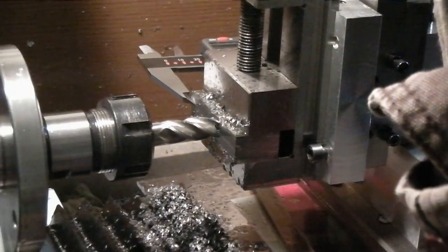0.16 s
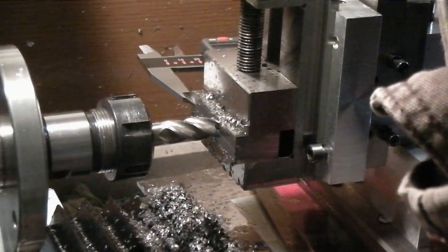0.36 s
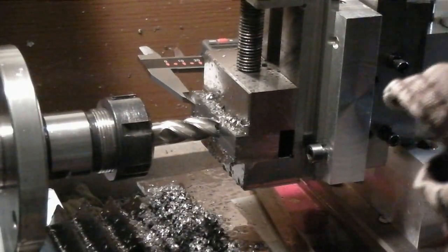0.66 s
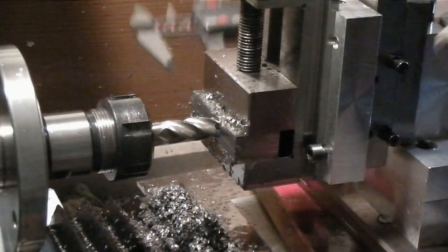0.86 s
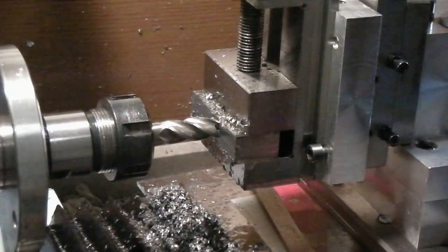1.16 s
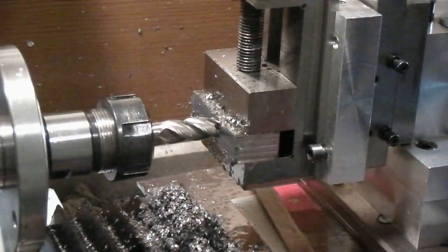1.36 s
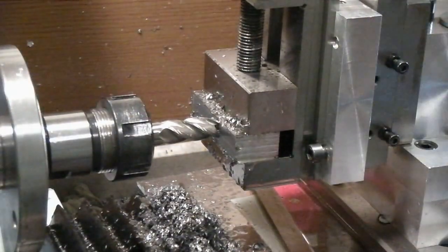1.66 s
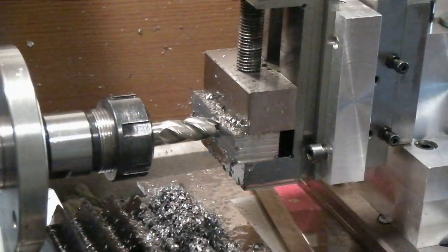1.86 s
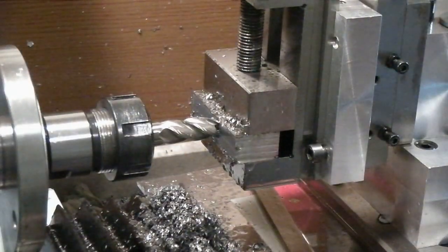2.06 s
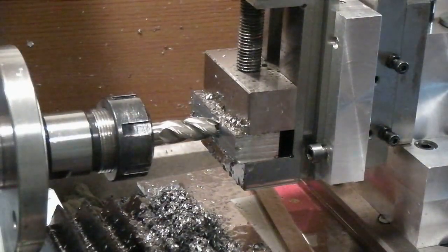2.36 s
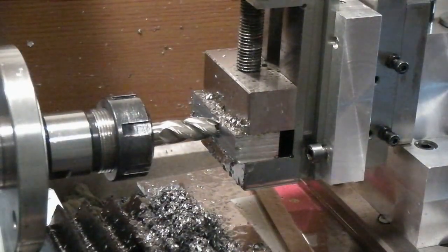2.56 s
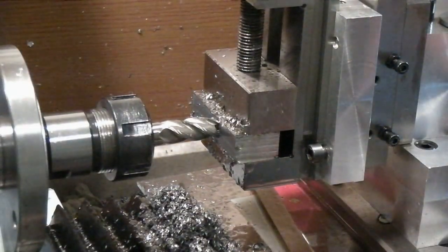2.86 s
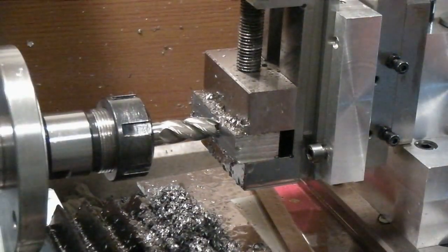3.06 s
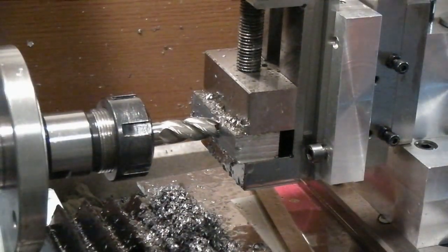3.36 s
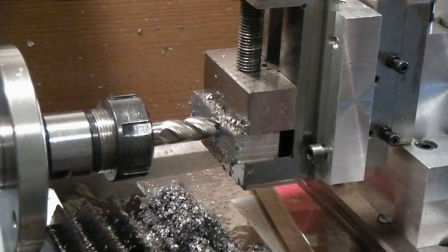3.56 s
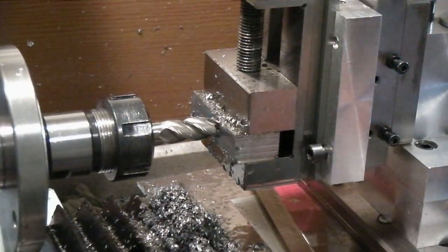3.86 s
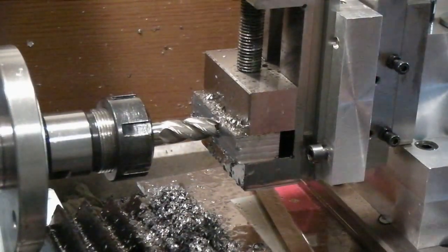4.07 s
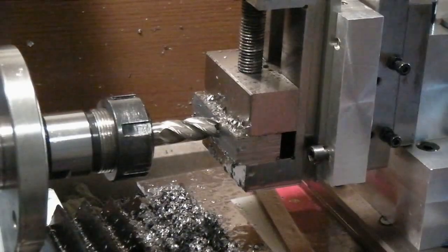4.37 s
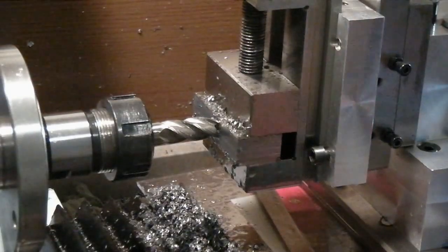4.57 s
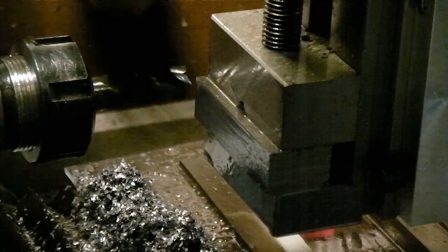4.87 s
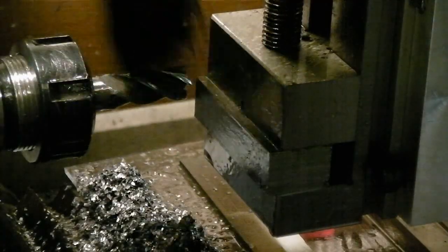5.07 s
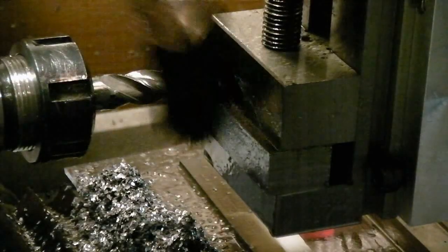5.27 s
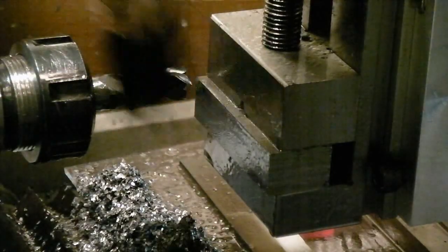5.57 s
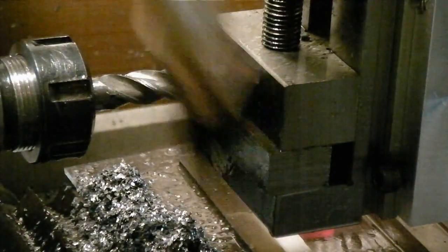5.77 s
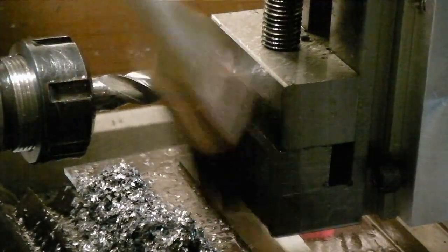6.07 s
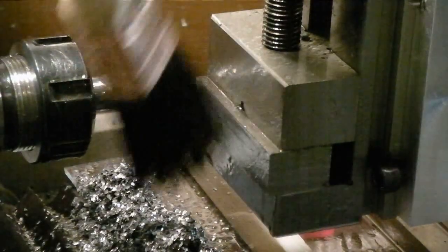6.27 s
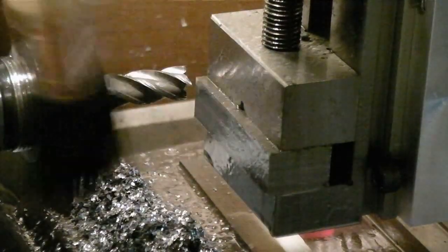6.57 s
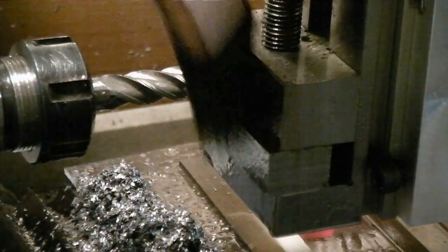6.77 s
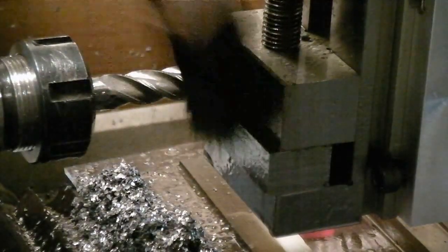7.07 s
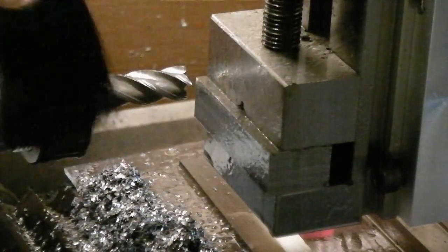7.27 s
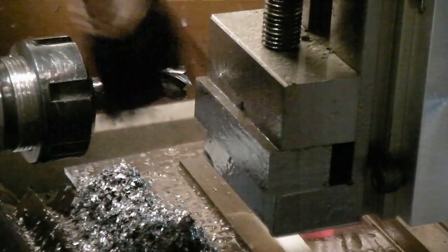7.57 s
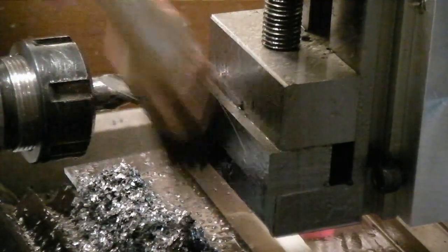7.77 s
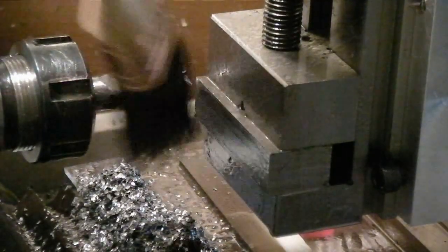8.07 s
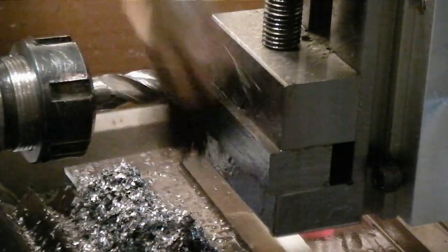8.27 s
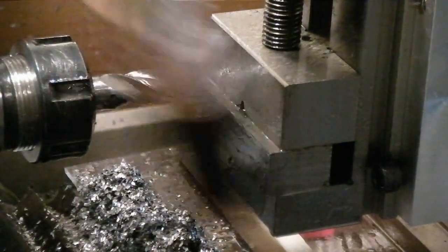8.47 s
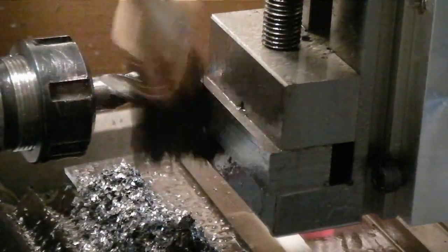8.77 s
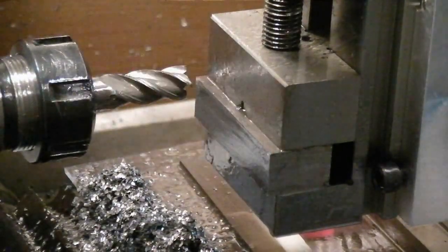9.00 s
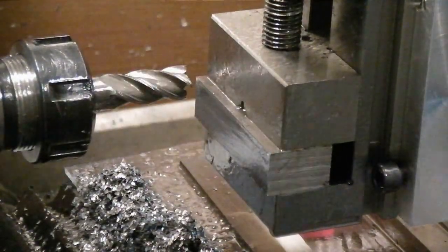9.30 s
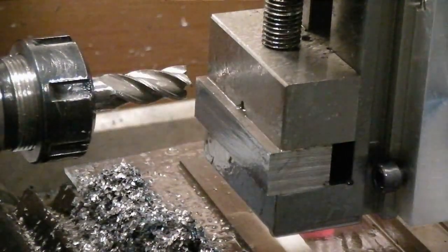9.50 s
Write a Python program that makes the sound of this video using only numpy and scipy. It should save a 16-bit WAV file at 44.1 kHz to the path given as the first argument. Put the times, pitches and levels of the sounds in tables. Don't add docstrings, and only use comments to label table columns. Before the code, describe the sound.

A close stereo pickup in a small workshop, with soft hiss, a thin regular electrical buzz and faint low rumble. Near 0.9-1.2 s a thin steel tool makes light, bright ticks; at 1.4-1.6 s a handle is set down with dull knocks and sleeve rustle. A crisp metallic snap comes at 1.8 s, then thin scraping, with a faint rising squeal near 2.8 s. Hard ringing drops hit at 3.0 and 3.1 s, another with a short scrape at 3.3 s, and a heavy clamp slams loudest at 3.75 s, bouncing and booming the bench. Smaller clinks continue to 4.75 s. After about a tenth of a second of silence, the hiss and rumble return stronger and a stiff brush sweeps chips in about twenty quick, grainy, bright strokes from 5 to 8.9 s, with sharp little ticks. Soft rustle and room noise finish by 9.7 s.

```python
import sys
import numpy as np
from scipy import signal
from scipy.fft import rfft, irfft, next_fast_len
from scipy.io import wavfile
from scipy.ndimage import uniform_filter1d

SR = 44100
rng = np.random.default_rng(int(sys.argv[2]) if len(sys.argv) > 2 else 0)


def to_wav(sig):
    pcm = np.clip(np.atleast_2d(sig), -1, 1) * 32767
    pcm = np.round(pcm).astype(np.int16)
    wavfile.write(sys.argv[1], SR, pcm.T)


def volts_from_decibels(level):
    exponent = np.asarray(level, float) / 20
    return 10 ** exponent


N = 425124

# (f/Hz, level/dB)
PORT_SIDE = [(60, -2.5), (110, -23), (200, -17.5), (380, -24.5), (700, -28), (1290, -26), (2380, -19),
             (4400, -12.5), (8120, -9.5), (15000, -2.5)]


def level(x, db):
    return x * volts_from_decibels(db) / np.sqrt(np.mean(x ** 2))


def colour(x, points):
    n = next_fast_len(x.shape[-1])
    hz, db = np.transpose(points)
    gain_db = np.interp(np.log(np.fft.rfftfreq(n, 1 / SR) + 1), np.log(hz), db)
    return irfft(rfft(x, n) * volts_from_decibels(gain_db), n)[..., :x.shape[-1]]


def band(x, lo_hz, hi_hz):
    return signal.sosfilt(signal.butter(2, [lo_hz, hi_hz], "band", fs=SR, output="sos"), x)


def resonate(x, peaks):
    out = 0
    for hz, width_hz, db in peaks:
        b, a = signal.iirpeak(hz, hz / width_hz, SR)
        out = out + volts_from_decibels(db) * signal.lfilter(b, a, x) / np.sqrt(width_hz)
    return out


def modes(table, t, detune):
    hz, db, t60_s = np.transpose(table)[:, :, None]
    detune = np.asarray(detune, float)[:, None]
    return np.sum(volts_from_decibels(db - 60 * t / t60_s) * np.sin(2 * np.pi * hz * (1 + detune) * (t + detune)), axis=0)


def walk(rate_hz):
    k = int(SR / rate_hz)
    held = np.repeat(rng.standard_normal(N // k + 1), k)
    return 1.47 * uniform_filter1d(held, k)[:N]


def grains(per_s, spread_db):
    hit = rng.random(N) < per_s / SR
    slip, extra = rng.standard_normal(N), rng.exponential(size=N)
    out = np.zeros(N)
    out[hit] = slip[hit] * volts_from_decibels(spread_db * np.minimum(extra[hit], 4))
    return out


def swells(rows):
    t, out = np.arange(N) / SR, np.full(N, -120.)
    for s, rise_s, fall_s, db in rows:
        span = slice(max(int((s - 4 * rise_s) * SR), 0), int((s + 4 * fall_s) * SR))
        drop_db = 20 * np.maximum((s - t[span]) / rise_s, (t[span] - s) / fall_s)
        out[span] = np.maximum(out[span], db - drop_db)
    return out


def ports(mid, side, points):
    side = colour(side, points)
    return np.array([mid + side, mid - side])


def rumble():
    # (t/s, level/dB)
    machinery = [(0.0, -79), (0.82, -68), (1.25, -70), (1.52, -67.5), (2.18, -72), (2.47, -67), (2.87, -73),
                 (3.19, -66), (3.53, -73), (4.7, -68), (4.8, -57.5), (5.5, -60), (6.3, -55.5), (7.0, -56.5),
                 (7.701, -57.5), (8.77, -57), (9.64, -64)]
    # (f/Hz, width/Hz, level/dB)
    room_modes = [(52.5, 19, 1.5), (76, 24, 0), (133, 13, -4.5), (242, 64, 2.5), (422, 136, -6)]
    # (fullest t/s, rise/s, fall/s, level/dB)
    treads = [
        (0.3, 2.5, 2.5, -77.5),
        (1.52, 1.4, 1.3, -67),
        (3.76, 0.092, 0.45, -45),
        (4.3, 0.95, 1.8, -61),
        (4.74, 0.28, 0.16, -52),
        (5.55, 0.82, 4.5, -55),
        (7.65, 3.5, 2.3, -57.5),
        (8.5, 1.1, 2.4, -56),
    ]
    deep_db = np.interp(np.arange(N) / SR, *np.transpose(machinery))
    upper_db = np.maximum(deep_db - 3.5, swells(treads))
    out = 0
    for hz, width_hz, db in room_modes:
        pair = level(resonate(rng.standard_normal((2, N)), [(hz, width_hz, 0)]), db)
        drive_db = upper_db if hz > 110 else deep_db
        out = out + pair * volts_from_decibels(2.0 * walk(2.01) + drive_db - 2.0)
    return np.array([out[0] + 0.057 * out[1], out[0] - 0.11 * out[1]])


def rustle():
    # (fullest t/s, rise/s, fall/s, rub level/dB, crispness/dB)
    moves = [(0.94, 0.29, 0.61, -69, -2), (1.44, 0.19, 0.68, -58, -2), (1.47, .05, .12, -51.5, -11),
             (1.53, .06, 0.086, -52.5, -6), (1.63, .04, 0.12, -59, -10), (1.95, 0.85, 0.13, -67.5, 6),
             (2.65, 1.2, 0.88, -61, 1), (3.0, 1.2, 0.0081, -60, 1.5), (3.38, 0.37, 0.58, -49.5, -17),
             (3.62, 0.83, 0.087, -60.5, 2), (3.695, 0.094, 0.19, -46.5, -17), (3.96, 0.073, 0.59, -54.5, 2),
             (4.26, 0.93, 0.72, -58.5, 1), (4.72, 0.51, 0.35, -72, 2.5), (9.238, 0.17, 0.45, -56.5, -1),
             (9.6, 1.6, 1.5, -59, 0)]
    rub = level(band(grains(5000, 1.5), 300, 1900) * volts_from_decibels(1.5 * walk(25)), 0)
    fine = level(band(grains(8000, 1.5), 1800, 7500) * volts_from_decibels(1.2 * walk(30)), 0)
    rub_rows = [row[:4] for row in moves]
    fine_rows = [(s, rise_s, fall_s, db + crisp_db) for s, rise_s, fall_s, db, crisp_db in moves]
    return rub * volts_from_decibels(swells(rub_rows)) + fine * volts_from_decibels(swells(fine_rows))


def contact_shape(hz, hard_db, thud_db, clink_db, crack_db):
    wide_db = 10 * np.log10(hz / 1500)
    thud_db = thud_db + wide_db
    clink_db = clink_db + hard_db
    crack_db = crack_db + 1.7 * hard_db + wide_db
    return [(110, thud_db - 16.5),
            (min(420, hz / 1.7), thud_db + 8.5),
            (hz / 1.5, -7), (hz, 0), (hz * 1.21, -6),
            (max(min(hz * 1.68, 4700), hz * 1.35), .5 * clink_db - 10.0),
            (max(5000, hz * 1.4), clink_db + wide_db - 2.0),
            (max(6500, hz * 0.72), clink_db + wide_db - 7.5),
            (10000, crack_db - 4.5), (15000, crack_db - 12.5)]


def knocks():
    # (t/s, peak level/dB, body f/Hz, hardness/dB)
    gauge = [
        (0.843, -46.5, 1730, -7),
        (0.939, -40, 2300, -9),
        (.945, -48, 2200, -3),
        (0.9735, -32, 2900, 5),
        (1.121, -41, 2970, -9),
        (1.138, -50, 2900, -4),
        (1.148, -48, 4500, 4),
        (1.161, -49, 2900, 2),
        (1.174, -40.5, 2760, -1.5),
    ]
    spanner = [
        (2.428, -37.5, 2880, -12),
        (2.448, -39, 2950, -5),
        (3.0225, -12.5, 2730, 1.5),
    ]
    handle = [
        (1.429, -40, 566, 4.5),
        (1.456, -37, 610, -4),
        (1.509, -41.5, 696, 5),
        (1.618, -40.5, 700, -8),
        (3.45, -38, 644, 3),
        (3.467, -32.5, 606, 1),
        (3.479, -30.5, 640, 1.5),
    ]
    clamp = [
        (3.745, -18.5, 1050, -5),
        (3.753, -5, 2000, 0.5),
        (3.761, -18, 2050, -5),
        (3.777, -20, 2030, 2.5),
        (3.815, -18, 1660, -2),
        (3.85, -32, 2000, -4),
        (3.919, -37, 5200, 4),
        (3.978, -36, 4030, 3),
    ]
    key = [
        (4.167, -31, 1750, 0.5),
        (4.174, -36.5, 1660, -9),
        (4.43, -33, 1590, 0),
        (4.489, -37, 2200, -2),
        (4.497, -35.5, 2050, -8),
        (4.531, -34, 4250, -6),
        (4.651, -27.5, 1530, 1.5),
        (4.746, -32.5, 1320, -1),
        (4.752, -33, 2990, -2.5),
    ]
    jaws = [
        (1.833, -31, 5020, 4.7),
        (1.8355, -25, 5640, 4.1),
        (2.038, -45.5, 3580, 3.8),
    ]
    pin = [
        (2.103, -40, 3300, -2),
        (3.297, -22.5, 2050, .5),
    ]
    mallet = [
        (3.1205, -13.5, 1250, 0.5),
        (3.124, -14.5, 718, -8.5),
        (3.143, -25.5, 1406, -5),
    ]
    # (f/Hz, level/dB, t60/s)
    gauge_ring = [(2730, -4, 0.069), (3085, -6, .12), (3530, 7, .05), (4530, 3, 0.21), (4400, 8.5, 0.079),
                  (5480, 3, 0.063), (5900, 2, 0.074), (8830, 1, .04), (9500, -13, 0.045)]
    spanner_ring = [(2760, 0, 0.063), (3170, -8.5, 0.089), (5060, 4, 0.041), (5380, -3.5, 0.1),
                    (5670, 1.5, 0.054), (6340, -9, 0.13), (9000, -20, 0.13), (10840, -6.5, 0.15)]
    handle_ring = [(671, -5.5, 0.25), (786, -6.5, 0.19), (1250, 1, 0.072), (1650, -3.5, 0.067)]
    clamp_ring = [(1180, -9, 0.34), (1580, -4.5, 0.25), (1750, -8.5, 0.2), (1910, -14, 0.22),
                  (2000, -3, 0.19), (2142, 2, 0.1), (2260, -12, 0.22), (2404, -21, 0.23), (3300, -26, .25),
                  (4930, -21, .3), (5560, -15, .3), (7200, -19.5, .2)]
    key_ring = [(1587, -1, 0.34), (1747, -6, 0.41), (2050, 0.5, 0.096)]
    jaws_ring = [(2720, -3, 0.039), (4470, -9, .15), (5080, 0, 0.16), (7100, -9, 0.092), (5600, -1, 0.15),
                 (6100, -1, .16), (6620, -1, .12), (8270, -14, .08), (8850, -9, .12), (10700, -12, .1),
                 (11320, -18, .1), (12050, -18, .1)]
    pin_ring = [(1330, -4, .1), (2070, -4, 0.13), (2950, 8, 0.044), (4530, -1.5, 0.051), (6000, 3, 0.07),
                (9500, -10, .06), (12320, -24, 0.059)]
    mallet_ring = [(781, -5.5, 0.39), (1040, -9, 0.27), (1280, -9.5, 0.15), (1510, -3, 0.2),
                   (1770, -2.5, .15), (3590, -17.5, .1)]
    # (blows, modes, contact/s, thud/dB, clink/dB, crack/dB)
    objects = [(gauge, gauge_ring, 0.0032, -41, -5, -10),
               (spanner, spanner_ring, 0.001, -12, -5, -13),
               (handle, handle_ring, 0.003, -5, -10, -27),
               (clamp, clamp_ring, 0.0031, -14, -16, -22.5),
               (key, key_ring, 0.0058, -8, -4, -15.5),
               (jaws, jaws_ring, 0.0012, -28, -8, -12),
               (pin, pin_ring, 0.00096, -11.5, -3.5, -12.5),
               (mallet, mallet_ring, 0.0011, -16.5, -12.5, -21)]
    rings_db = [-9, -8, -15, -11.5, -14.5, -9.5, -12, -15.5]
    ring_per_hardness = [1.24, 0.64, 0.29, 0.35, 0.033, 0.85, .3, 0.059]
    # (note level/dB, note t60/s, scratch level/dB)
    bodies = [(-4, 0.049, 11), (-4.5, 0.025, 0.5), (-5.5, .04, -1.5), (-2, .025, -5), (-12.5, 0.031, 4),
              (-3.5, 0.021, -.5), (-8, .03, 0.5), (-4, .03, -5.5)]
    near, far = np.zeros(N + SR), np.zeros(N + SR)
    t = np.arange(6144) / SR
    snap_s = 0.00036
    for thing, ring_db, more, body in zip(objects, rings_db, ring_per_hardness, bodies):
        blows, ring, contact_s, *shape_db = thing
        note_db, note_s, scratch_db = body
        decay = np.exp(-t / contact_s) + 0.082 * np.exp(-t / 0.013)
        envelope = (1 - np.exp(-t / (0.22 * contact_s))) * decay
        for s, db, hz, hard_db in blows:
            shape = contact_shape(hz, hard_db, *shape_db)
            wide_db = 10 * np.log10(hz / 1500)
            size = volts_from_decibels(db - wide_db)
            burst = volts_from_decibels(scratch_db) * colour(rng.standard_normal(len(t)), shape) * envelope
            note = volts_from_decibels(wide_db) * modes([(hz, note_db, note_s)], t, [0])
            rough = 0.5 + 0.55 * level(uniform_filter1d(rng.standard_normal(len(t)), size=120), 0)
            rings = modes(ring, t, 0.0055 * rng.standard_normal(len(ring)))
            rings = rings * volts_from_decibels(ring_db + more * hard_db) * rough * np.minimum(1, (t[-1] - t) / 0.038)
            pulse = size * 14 * colour(np.roll(t == 0, 200), shape)
            i = int(s * SR)
            near[i:i + len(t)] += size * (burst + note + rings)
            near[i - 196:i - 196 + len(t)] += pulse * snap_s / contact_s
            far[i - 200:i - 200 + len(t)] += pulse
            far[i:i + len(t)] += size * 0.27 * rings
    return near[:N], far[:N]


def thumps():
    # (t/s, peak level/dB)
    set_downs = [
        (1.422, -56.5),
        (2.429, -52),
        (3.023, -44),
        (3.12, -43),
        (3.293, -50.5),
        (3.755, -30.5),
    ]
    # (f/Hz, level/dB, t60/s)
    bench = [(111.3, -5, 0.77), (135, 0.5, 0.33), (246.3, -4, 0.24), (280.5, -2, 0.39), (356.5, -7, 0.57),
             (396, -1.5, 0.24), (553, -6.5, 0.17)]
    out, t = np.zeros(N + SR), np.arange(SR // 2) / SR
    for s, db in set_downs:
        boom = modes(bench, t, 0.026 * rng.standard_normal(len(bench))) * (1 - np.exp(-t / 0.0072))
        i = int(s * SR)
        out[i:i + len(t)] += boom * volts_from_decibels(db + 2.0) * np.minimum(1, (t[-1] - t) * 10)
    return out[:N]


def slide():
    # (fullest t/s, rise/s, fall/s, level/dB, f/Hz, width/Hz)
    hums = [
        (2.52, .25, .3, -65.5, 1380, 160),
        (2.82, 0.49, .2, -60.5, 1360, 73),
        (2.86, .1, 0.081, -55, 3220, 70),
        (2.82, 0.3, .3, -66, 4410, 92),
        (2.4, 0.13, .15, -60.5, 2900, 130),
        (1.9, 0.11, .1, -54.5, 3300, 500),
        (3.283, 0.033, .025, -35.5, 1330, 160),
        (4.35, 0.2, .12, -72, 9000, 350),
        (4.14, .2, .3, -61, 9900, 500),
    ]
    # (fullest t/s, rise/s, fall/s, level/dB, f/Hz)
    squeals = [
        (2.76, .12, .15, -66, 10500),
        (2.86, .15, .08, -60, 11450),
    ]
    slips, out = grains(5000, 1.5), 0
    for *swell, hz, width_hz in hums:
        out = out + level(resonate(slips, [(hz, width_hz, 0)]), 0) * volts_from_decibels(swells([swell]))
    for *swell, hz in squeals:
        speedup_s = np.clip(np.arange(N) / SR - swell[0], -.3, .1)
        pitch_hz = hz * (1 + .008 * walk(300) + 0.5 * speedup_s)
        out = out + np.sin(2 * np.pi * np.cumsum(pitch_hz) / SR) * volts_from_decibels(swells([swell]) - 7.0)
    return out


def bristles(pitches_hz):
    # (f/Hz, level/dB per Hz)
    hiss_colour = [(1470, -4), (2500, 12.5), (2600, -7), (2770, 9.5), (3890, -6), (6810, -3), (7890, -6.5),
                   (9660, -5.5), (15200, -13), (16000, -13)]
    kinds = 0
    for hz in pitches_hz:
        slips = grains(7000, 1.1) * volts_from_decibels(0.85 * walk(500))
        kinds = kinds + level(band(slips, hz / 1.138, hz * 1.275), 0) * np.sqrt(hz)
    return level(colour(kinds, hiss_colour), 0)


def brush():
    # (fullest t/s, rise/s, fall/s, level/dB, fine tips/dB)
    brush_strokes = [(5.025, 0.073, 0.17, -49.5, 1), (5.138, .05, 0.051, -58.5, 3),
                     (5.33, 0.044, 0.099, -48, 2.5), (5.401, 0.069, 0.08, -52, 2.5),
                     (5.556, 0.027, 0.066, -46.5, 5.5), (5.576, 0.045, 0.044, -45.5, -1),
                     (5.636, 0.11, 0.087, -50.5, 0), (5.812, 0.035, 0.11, -47, 0),
                     (5.856, 0.082, 0.081, -41.5, 1.5), (6.11, 0.032, .1, -48, -3),
                     (6.165, 0.071, 0.048, -39, 2), (6.526, 0.06, 0.11, -50, 2),
                     (6.602, 0.052, 0.046, -50, 1), (6.836, 0.022, 0.26, -49, 1.5),
                     (6.936, 0.11, 0.023, -50.5, -0.5), (7.133, 0.014, 0.19, -48, 1),
                     (7.203, 0.093, 0.026, -44, -1.5),
                     (7.468, 0.056, .1, -51.5, -1), (7.52, 0.077, 0.12, -42, 0.5),
                    (7.805, 0.032, .1, -53, 4), (7.852, 0.075, 0.062, -43, 4),
                    (8.066, .014, 0.095, -46.5, 9), (8.097, 0.049, .02, -40, 6),
                    (8.312, 0.022, 0.15, -46.5, 2.5), (8.35, 0.061, 0.023, -44, 5.5),
                    (8.58, 0.028, 0.089, -41, 0.5), (8.604, 0.056, 0.019, -47, 8.5),
                    (8.812, 0.016, 0.089, -41.5, 5), (8.835, 0.053, 0.019, -45, -13),
                    (8.895, 0.097, 0.068, -49.5, 3)]
    # (t/s, peak level/dB)
    tuft_ticks = [(5.0055, -41), (5.3188, -39), (5.5493, -43), (5.5554, -38), (5.7982, -41), (6.1085, -40),
                  (6.1444, -34), (6.5211, -29), (6.8324, -30), (7.1302, -41), (7.505, -32), (7.8096, -30),
                  (8.0606, -36), (8.3055, -38), (8.327, -29), (8.5759, -31), (8.808, -27)]
    # (f/Hz, level/dB)
    pan = [(2000, 1.5), (5000, 0.1), (9000, 1.6), (13000, 0)]
    rows = brush_strokes
    settle_s, tick_s, tip_time = 0.076, 0.0026, 0.76
    settle_db = swells([(s, rise_s, settle_s, db - 8) for s, rise_s, _, db, _ in rows])
    press_db = np.maximum(swells([row[:4] for row in rows]), settle_db)
    tips_db = swells([(s, rise_s * tip_time, fall_s * tip_time, db + fine_db)
                      for s, rise_s, fall_s, db, fine_db in rows])
    firm_db = swells([(s, rise_s, fall_s, db - 0.12 * fine_db) for s, rise_s, fall_s, db, fine_db in rows])
    ticks = volts_from_decibels(swells([(s, tick_s * 1.7, tick_s * 4, db - 20.5) for s, db in tuft_ticks]))
    chatter = volts_from_decibels(1.24 * walk(90))
    stiff = volts_from_decibels(press_db) * chatter + 0.54 * ticks
    tips = volts_from_decibels(np.maximum(tips_db, settle_db)) * chatter + ticks
    mid, side = (stiff * bristles((4300, 6200)) + tips * bristles((9300, 13000)) for _ in range(2))
    scrape = level(band(band(grains(4600, 1.4), 1090, 4100), 460, 6600), -0.98)
    mid_press_db = -50
    scrape_db = mid_press_db - 4 + 0.99 * (np.maximum(firm_db, settle_db) - mid_press_db)
    mid = mid + scrape * volts_from_decibels(scrape_db)
    left, right = ports(mid, volts_from_decibels(1.5) * side, PORT_SIDE)
    return np.array([colour(left, pan), colour(right, np.multiply(pan, [1, -1]))]), mid


def room(x, wet_db, early_s, early_db):
    # (f/Hz, t60/s)
    decays = [(150, 0.99), (600, 0.54), (2000, 0.47), (5000, 0.5), (12000, 0.055)]
    t = np.arange(SR) / SR
    tail = 0
    for hz, t60_s in decays:
        fade = volts_from_decibels(-60 * t / t60_s) + volts_from_decibels(early_db) * np.exp(-t / early_s)
        noise = band(rng.standard_normal((2, SR)), hz / 2.44, min(hz * 2.17, .45 * SR))
        tail = tail + level(noise, 0) / np.sqrt(1000 / hz) * fade
    tail = tail * (1 - np.exp(-t / 0.0002))
    wet = signal.fftconvolve(x[None], tail * volts_from_decibels(wet_db), axes=1)[:, :N]
    return ports(wet[0], volts_from_decibels(4.0) * wet[1], PORT_SIDE)


def scene():
    background = rumble()
    cloth = rustle()
    blows, pulses = knocks()
    booms = thumps()
    rubbing = cloth + slide()
    strokes, strokes_mid = brush()
    send = pulses + volts_from_decibels(-15.0) * strokes_mid + volts_from_decibels(-8.5) * rubbing
    echo = room(send, wet_db=-39.0, early_s=0.0029, early_db=1.5)
    close = ports(blows + rubbing + booms, np.roll(blows, 5) + np.roll(rubbing, 300), PORT_SIDE)
    return close + strokes + echo + background


def low_pass(x):
    return signal.sosfilt(signal.butter(12, 16650, fs=SR, output="sos"), x)


def record(dry):
    # (f/Hz, level/dB per Hz)
    hiss_colour = [(15, -30), (25, -10), (55, -4.5), (82, -14.5), (149, -1.5), (195, -14.5), (301, -10.5),
                   (1020, -13), (1610, -11.5), (7510, -18.5), (16000, -28)]
    # (f/Hz, level/dB)
    hiss_side = [(60, -9.5), (110, -18), (200, -5.5), (380, -8.5), (700, -7.5), (1290, -8.5), (2380, -6.5),
                 (4400, -2.5), (8120, -1), (15000, 1.5)]
    # (start t/s, end t/s, hiss level/dB, first spike t/s, spike level/dB, offset/full scale)
    takes = [
        (0, 4.777, -62, .00107, -44, -.0011),
        (4.891, 9.7, -58, 4.901, -38, -.0017),
    ]
    # (f/Hz, level/dB)
    housing = [(7500, 0), (7780, -5.5), (7900, -17), (8020, -4.5), (8300, 0.5)]
    # (f/Hz, level/dB)
    treble_limit = [(15750, 0), (15900, -30), (16600, -45)]
    hiss_trim_db, spike_trim_db = [0, 0.2], [0.5, -2.5]
    buffer_s = 1024 / 48000
    hiss = level(colour(rng.standard_normal((2, N)), hiss_colour), 0)
    hiss = ports(hiss[0], hiss[1], hiss_side)
    hiss_gain, running, electric = np.zeros((3, N))
    for k, (start_s, end_s, hiss_db, first_s, spike_db, offset) in enumerate(takes):
        take = slice(int(start_s * SR), int(end_s * SR))
        hiss_gain[take] = volts_from_decibels(hiss_db + hiss_trim_db[k])
        running[take] = 1
        electric[take] = offset
        spikes_s = np.arange(first_s, min(end_s, N / SR - buffer_s / 20), buffer_s)
        at = np.round(spikes_s * SR).astype(int)
        size = volts_from_decibels(spike_db + spike_trim_db[k] + 1.2 * rng.standard_normal(len(at)))
        electric[at[:, None] + [-1, 0, 1]] += size[:, None] * [.55, 1, .6]
    sound = colour(dry + hiss * hiss_gain, housing) + electric
    mix = colour(sound * uniform_filter1d(running, size=220), treble_limit)
    return low_pass(mix)


dry = scene()
out = record(dry)
to_wav(out)
```